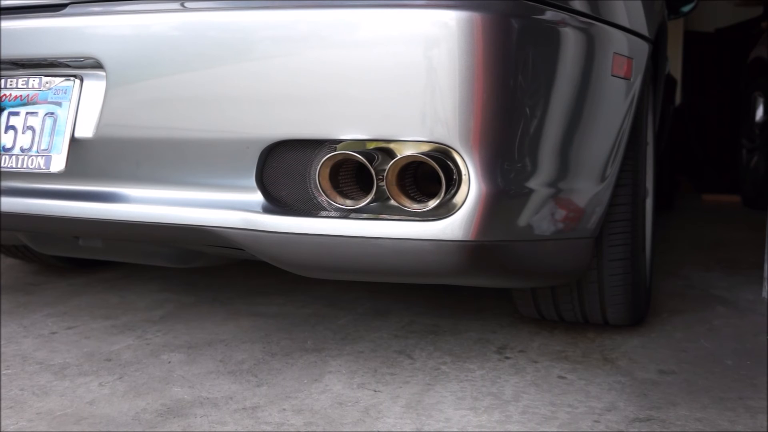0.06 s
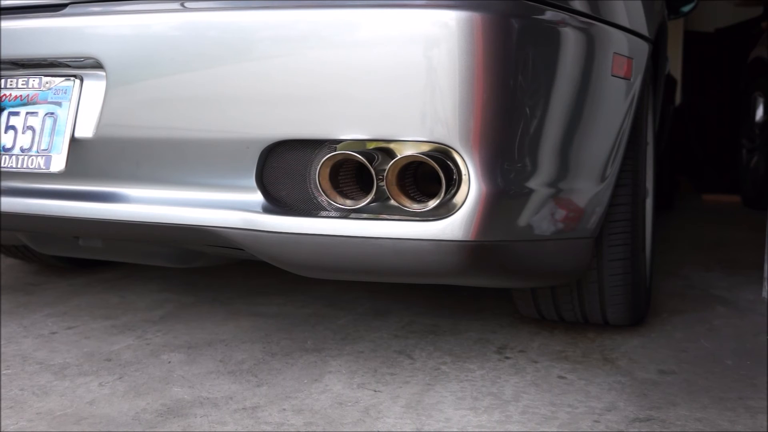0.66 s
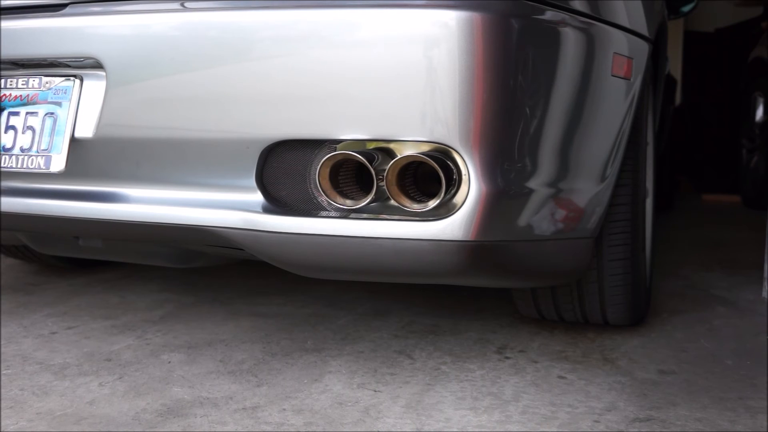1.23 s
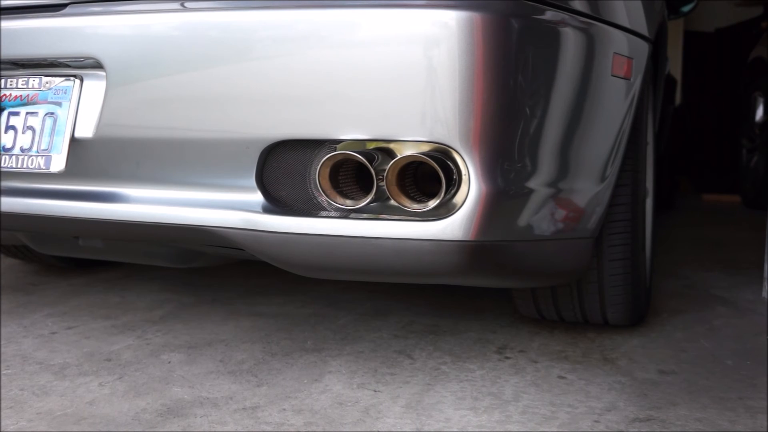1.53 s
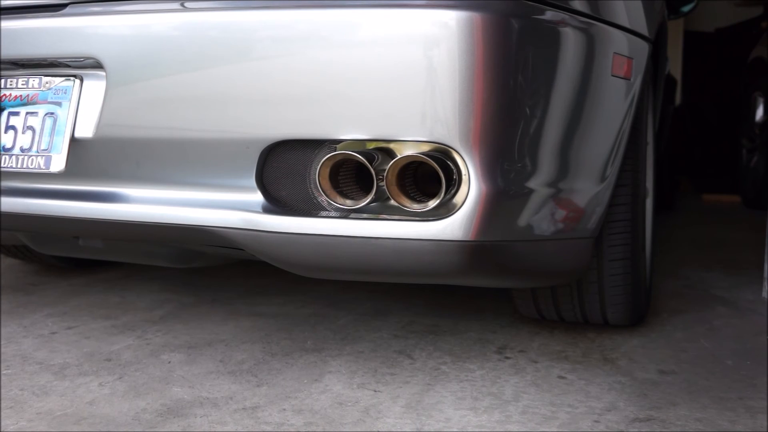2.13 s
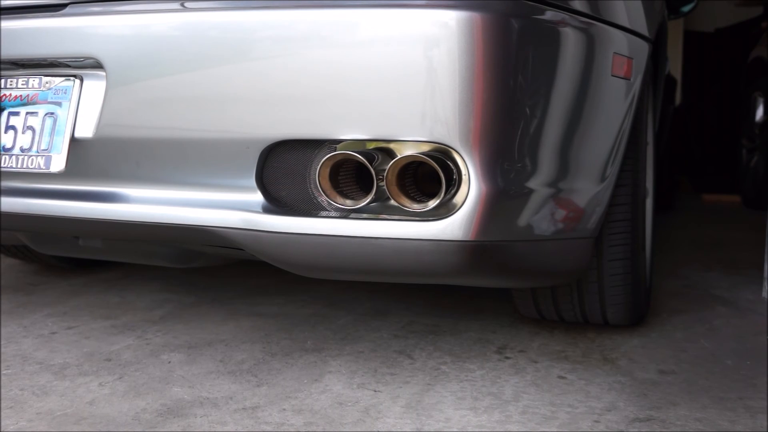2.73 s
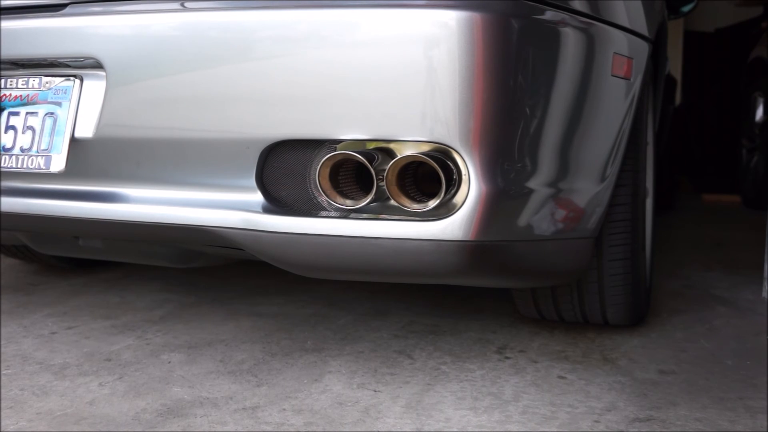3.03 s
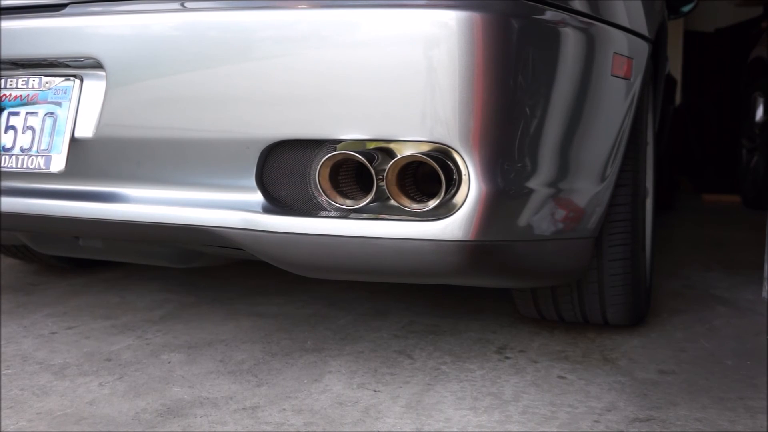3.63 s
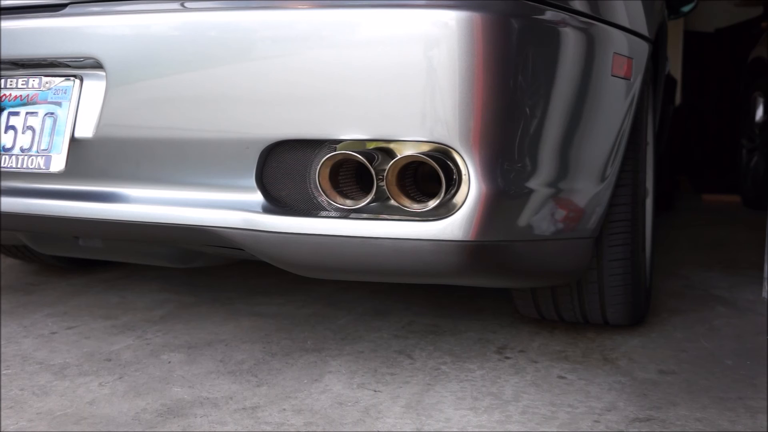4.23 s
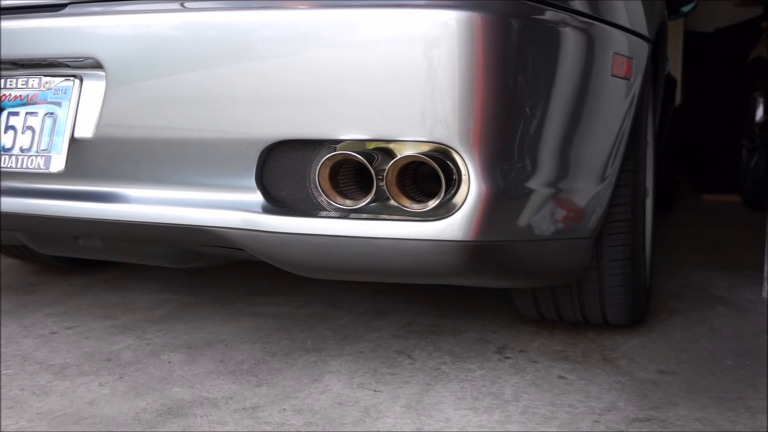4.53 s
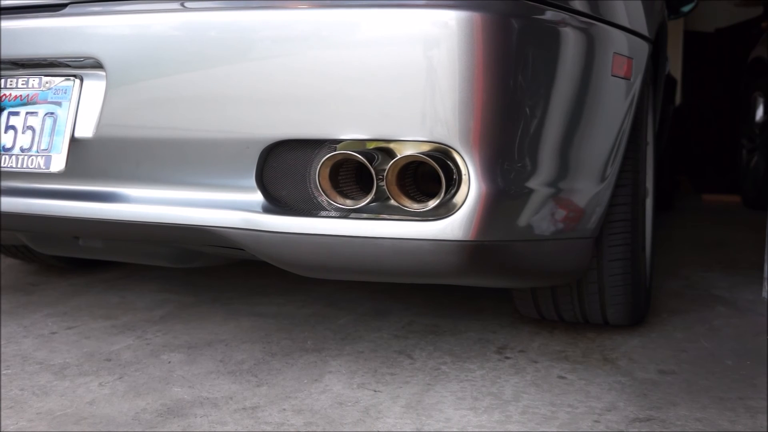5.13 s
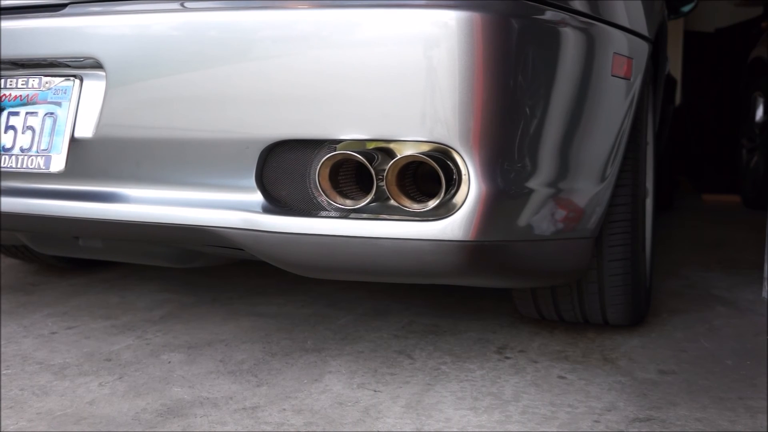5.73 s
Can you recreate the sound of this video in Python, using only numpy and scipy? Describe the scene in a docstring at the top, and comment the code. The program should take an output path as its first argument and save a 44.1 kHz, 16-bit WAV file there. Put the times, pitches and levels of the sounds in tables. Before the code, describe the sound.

Close behind twin tailpipes, a parked car idles with a throbbing drone and faint hiss, dipping once in speed before recovering.

```python
"""A six-cylinder car idles in a garage, heard just behind its twin tailpipes; late on it sags and picks up.
The two banks fire in turn (one turn = one firing of each), and the silencer booms at whole multiples
of that rate. Each firing barks in the tailpipes and lets out a hissing puff of gas. Turbulence rumbles
underneath, a thin pump whine sits on top, and concrete walls add standing waves and a short reverb."""
import sys
import numpy as np
from scipy import signal
from scipy.fft import rfft, irfft
from scipy.io import wavfile
from scipy.ndimage import uniform_filter1d

SR = 44100
rng = np.random.default_rng(int(sys.argv[2]) if len(sys.argv) > 2 else 0)


def master_out(mix):
    """Clip the mix to full scale and print it as 16-bit PCM to the path in sys.argv[1]."""
    frames = np.transpose(np.atleast_2d(mix))
    ceiling = np.clip(frames, -1, 1)
    pcm = np.round(ceiling * 32767).astype(np.int16)
    wavfile.write(sys.argv[1], SR, pcm)


N = 263718
T = np.arange(N) / SR
IDLE_HZ = 32.25  # firing rate of one bank

# The engine's idle, sag and pick-up. Each row: time in seconds, firing rate of one bank in Hz.
FIRING_RATE = [(0.0, 32.53), (0.8, 32.21), (1.5, 32.5), (1.85, 32.02), (2.2, 32.49), (2.9, 31.71),
               (3.85, 31.63), (4.17, 31.98), (4.68, 29.39), (4.85, 29.71), (5.17, 33.33), (5.56, 33.41),
               (5.98, 30.61)]
def engine(throttle_span_hz=1.3):
    """Speed sets the throttle (-1 shut, 0 idle, 1 pulling); its rate of change in Hz/s is the effort."""
    hz, = curves(FIRING_RATE)
    throttle = np.tanh((hz - IDLE_HZ) / throttle_span_hz)
    effort = uniform_filter1d(np.gradient(hz) * SR, size=SR // 5)
    return hz, throttle, effort


# The body of the boom. Each row: multiple of the firing rate, then level in dB with the throttle shut,
# eased, at idle and pulling.
BOOM_ORDERS = [(2, -24.5, -18.5, -19.5, -19), (3, -15.5, -14.0, -14.0, -13.5), (4, -6.5, -6.5, -7.5, -11),
               (5, -27, -17, -14.0, -11), (6, -21, -16, -12.5, -10), (7, -25.5, -21.5, -22.5, -24),
               (8, -21.0, -24, -22.0, -18), (9, -34.5, -22, -24.5, -23.5), (10, -52.5, -34.5, -31.5, -27.5),
               (11, -36.5, -30.5, -28.5, -29.5)]
def silencer_boom(turn, throttle, even_lead=0.045, odd_lag=0.061, waver_db=0.45, own_waver_db=0.13):
    """Even orders come from both banks together, odd ones from their imbalance, which trails behind."""
    shared_db = waver_db * walk(22)
    crest = turn - .43
    throttle_states = [-1, -.4, 0, 1]
    boom = 0
    for order, *states_db in BOOM_ORDERS:
        gain = np.interp(throttle, throttle_states, undb(states_db))
        gain *= undb(shared_db + own_waver_db * walk(3.9))
        lag_cycles = odd_lag * (order - 3) if order % 2 else -even_lead
        sign = -1 if order <= 2 else 1  # below its lowest resonance the silencer answers in antiphase
        boom += sign * gain * np.cos(2 * np.pi * (order * crest - lag_cycles))
    return boom


# The tailpipes' ring. Each row: pitch in Hz, bandwidth in Hz, level in dB.
PIPE_MODES = [(349, 53, -6.5), (453.4, 10, -6), (478, 22, -2), (594.4, 44, 6.5), (656, 12, -6.5),
              (671.4, 29, -2), (734, 15, 0.5), (724, 81, -10.5), (842, 20, -2)]
# The ring of the back-flow. Each row: pitch in Hz, bandwidth in Hz, level in dB.
BACKFLOW_MODES = [(390, 13, -0.5), (504, 71, 1), (598, 35, -2), (805, 35, -6)]
# The back-flow's rhythm. Each row: place in the turn from 0 to 1, level in dB.
BACKFLOW_SLAPS = [(.12, -1), (.4, 0), (.66, -4)]
# The six cylinders. Each row: place in the cycle of three turns, bark level in dB, puff level in dB.
FIRING_ORDER = [(.38, -9, -4), (.856, .5, 1.5), (1.38, -8, -6), (1.856, -1, -2), (2.38, -9, -1),
                (2.856, 0, 0)]
def tailpipe_bark(turn, throttle, pull_cut_db=2.0, muffle_hz=920):
    """Firings ring the pipes, roughened by eddies; as the throttle shuts, gas slaps back between them."""
    pulses = sum(undb(db) * firings(turn, place, every=3, scatter_db=.9, jitter_s=.00003)
                 for place, db, _ in FIRING_ORDER)
    slaps = sum(undb(db) * firings(turn, place, every=1, scatter_db=1.6, jitter_s=.00007)
                for place, db in BACKFLOW_SLAPS)
    shut = np.clip(-throttle, 0, 1) ** 2
    strength = undb(-pull_cut_db * throttle)
    barks = level(ring(pulses * (1 - 0.59 * shut) * strength, PIPE_MODES), db=-30)
    backflow = level(ring(slaps * shut, BACKFLOW_MODES), db=-38)
    eddies = rng.standard_normal(N) * gas_puffs(turn, decay_s=0.012, steady=1.0) * strength
    rasp = level(ring(eddies, PIPE_MODES), db=-38)
    # the silencer's packing swallows the edge of each pulse
    packing = signal.butter(6, muffle_hz, fs=SR, output="sos")
    return signal.sosfilt(packing, barks + backflow + rasp)


def gas_puffs(turn, decay_s, steady):
    """Gas flow at the pipe mouths: a surge after each firing over a steady stream."""
    pulses = sum(undb(db) * firings(turn, place, every=3, scatter_db=1.8, jitter_s=.0003)
                 for place, _, db in FIRING_ORDER)
    age = T[:SR // 20] / decay_s
    puff = 2 * np.sqrt(age) * np.exp(-age)
    return steady + signal.fftconvolve(pulses, puff)[:N]


# The rumble's dark EQ. Each row: frequency in Hz, gain in dB.
RUMBLE_EQ = [(20, -23), (55, -21), (110, -11), (170, -0.5), (260, -9.5), (330, -14.5), (440, -16.5),
             (600, -18.5), (850, -17.5), (1000, -29.5), (1200, -26), (1600, -41.5), (4000, -79)]
def flow_rumble(turn):
    """Turbulence in the silencer rumbles under the firings."""
    surge = gas_puffs(turn, decay_s=0.0029, steady=0.76)
    return level(colour(wide_noise(side_db=-10.5) * surge, RUMBLE_EQ), db=-24)


# The hiss's breathy EQ. Each row: frequency in Hz, gain in dB.
HISS_EQ = [(590, -12.5), (1000, -16.5), (1190, -3.5), (1730, -5), (1960, 0.5), (2260, 0), (2720, -2),
           (2910, -7), (3150, -3.5), (3310, -3), (3700, -13), (5240, -16), (6110, -20.5), (6900, -16.5),
           (8970, -31.5), (15200, -120)]
# The fader ride on the hiss. Each row: time in seconds, gain in dB.
HISS_RIDE = [(0, -40), (2.5, -39.5), (3.2, -38), (4.3, -38.5), (5.7, -40)]
def gas_hiss(turn, swell_db):
    """Gas hisses from the pipe mouths, a little to the right, with a fine spit in the surges."""
    surge = gas_puffs(turn, decay_s=0.0034, steady=0.84)
    pan = undb([[-1.6], [1.3]])
    hiss = level(colour(wide_noise(side_db=-5.5) * surge, HISS_EQ), db=0) * pan
    grains = wide_noise(side_db=-17) * undb(2.4 * np.minimum(rng.exponential(size=N), 8)) * surge
    spit = colour(grains, [(1500, -2.5), (4500, 9.5), (7500, -18.5), (9000, -3.5), (14500, -8.0)])
    ride_db, = curves(HISS_RIDE)
    return (hiss + level(spit, db=-15)) * undb(ride_db + swell_db)


def pump_whine(hz, throttle, effort, base_hz=7393, rise_hz_per_hz=37, base_db=-57, duck_db=5):
    """A thin, unsteady pump tone: it climbs after a sag, swells with effort, ducks as the engine pulls."""
    sag_hz = lagging(np.maximum(IDLE_HZ - hz, 0), lag_s=0.3)
    pitch = base_hz + rise_hz_per_hz * sag_hz + 4 * walk(30)
    duck = np.clip(throttle / 0.46, 0, 1) ** 2
    db = base_db + 0.07 * effort * (1 - duck) - duck_db * duck + 1.5 * walk(43)
    phase = 2 * np.pi * np.cumsum(pitch) / SR
    octave = undb(-16.5) * np.sin(2 * phase)
    return np.sqrt(2) * undb(db) * (np.sin(phase) + octave)


def standing_waves(boom):
    """Waves between the walls, a quarter cycle off, make the boom differ between the ears."""
    side = colour(boom, [(64, -26), (128, -16.5), (190, -25), (230, -10), (280, -9.5), (360, -6),
                         (600, -30), (1500, -90)])
    return np.imag(signal.hilbert(side)) * np.array([[1], [-1]])


def garage(x, t60_s, wet_db, damp_hz):
    """Direct sound plus a dense, dull reverb off the concrete, different in each ear."""
    t = T[:SR // 2]
    tail = rng.standard_normal((2, len(t))) * undb(-60 * t / t60_s) * (t > .005)
    tail /= np.sqrt(np.sum(tail[0] ** 2))
    tail = signal.sosfilt(signal.butter(1, damp_hz, fs=SR, output="sos"), tail)
    x = np.broadcast_to(x, (2, N))
    return x + undb(wet_db) * signal.fftconvolve(x, tail, axes=1)[:, :N]


def firings(turn, place, every, scatter_db, jitter_s):
    """A pulse once in `every` turns, each with its own strength and a slight timing slip."""
    slip, accent = rng.standard_normal((256, 2)).T
    times = np.interp(every * np.arange(len(slip)) + place, turn, T, right=np.inf) + jitter_s * slip
    heard = (times > 0) & (times < T[-1])
    return np.bincount((times[heard] * SR).astype(int), undb(scatter_db * accent[heard]), N)


def ring(x, modes):
    """Play a signal through parallel resonators."""
    return sum(undb(db) * signal.lfilter(*signal.iirpeak(hz, hz / width, fs=SR), x)
               for hz, width, db in modes)


def colour(x, points):
    """EQ through (Hz, dB) points."""
    hz, db = np.transpose(points)
    bins_hz = np.maximum(np.arange(N // 2 + 1) * SR / N, 1)
    return irfft(rfft(x) * undb(np.interp(np.log(bins_hz), np.log(hz), db)), N)


def wide_noise(side_db):
    """Stereo white noise; the side level sets its width."""
    mid, side = rng.standard_normal((2, N))
    return mid + undb(side_db) * side * np.array([[1], [-1]])


def walk(rate_hz):
    """Smooth random wander with an rms of 1."""
    rolloff = np.exp(-(np.arange(N // 2 + 1) * SR / N / rate_hz) ** 2)
    return level(irfft(rfft(rng.standard_normal(N)) * rolloff, N), db=0)


def lagging(x, lag_s):
    """Follow a control sluggishly."""
    keep = np.exp(-1 / (lag_s * SR))
    return signal.lfilter([1 - keep], [1, -keep], x)


def curves(table):
    """Automation curves from a timed table, one per value column."""
    times, *columns = np.transpose(table)
    return [np.interp(T, times, column) for column in columns]


def level(x, db):
    """Scale to an rms level."""
    return x * undb(db) / np.sqrt(np.mean(x ** 2))


def undb(db):
    """Decibels to gain."""
    return 10 ** (np.asarray(db) / 20)


def scene(fade_start_s=5.76, fade_db_per_s=16.5):
    """The firing rate drives every layer; boom, bark and hiss follow the effort and fade at the end."""
    hz, throttle, effort = engine()
    hunting = .0025 * walk(6)
    turn = np.cumsum(hz) / SR + hunting
    fade_db = -fade_db_per_s * np.maximum(T - fade_start_s, 0)
    effort_db = effort * np.where(effort < 0, 0.19, 0.103)  # weaker slowing, fuller gathering speed
    drive = undb(-0.2 + effort_db + fade_db)
    boom = silencer_boom(turn, throttle) * drive
    barks = garage(tailpipe_bark(turn, throttle) * drive, t60_s=.2, wet_db=-9, damp_hz=3000)
    hiss = gas_hiss(turn, swell_db=0.13 * effort + fade_db / 2)
    hiss = garage(hiss, t60_s=0.071, wet_db=-8.5, damp_hz=4130)
    return boom + barks + flow_rumble(turn) + hiss + pump_whine(hz, throttle, effort) + standing_waves(boom)


def record(dry, top_hz=15100):
    """A soft clip rounds the tallest crests and a steep low-pass cuts the top."""
    rounded = dry / (1 + dry ** 12) ** (1 / 12)
    return signal.sosfilt(signal.ellip(8, .2, 70, top_hz, fs=SR, output="sos"), rounded)


dry = scene()
out = record(dry)
master_out(out)
```